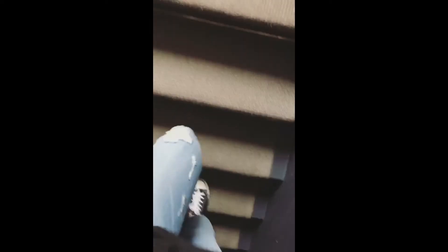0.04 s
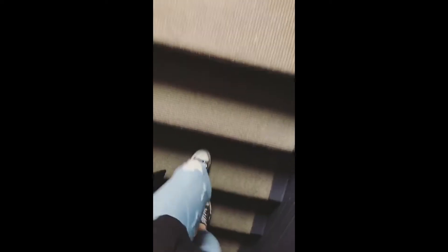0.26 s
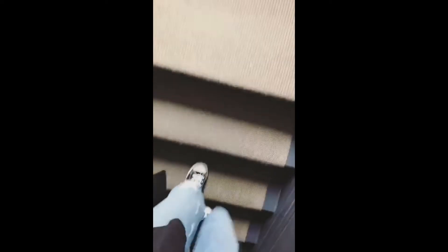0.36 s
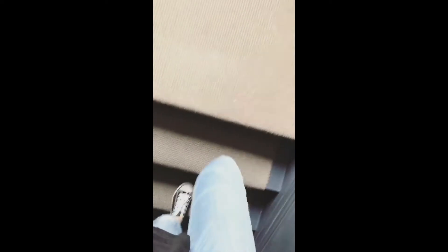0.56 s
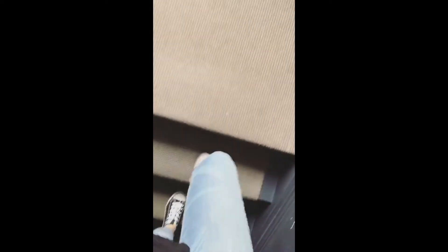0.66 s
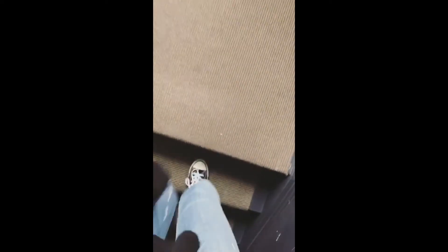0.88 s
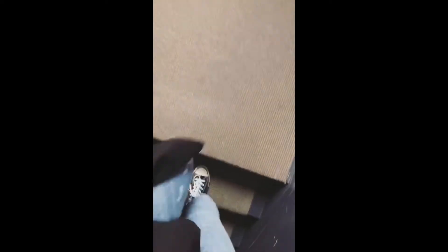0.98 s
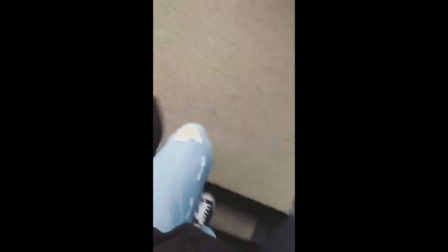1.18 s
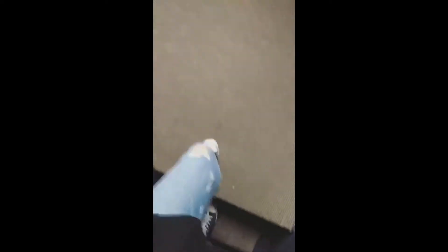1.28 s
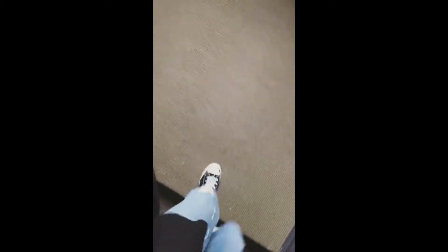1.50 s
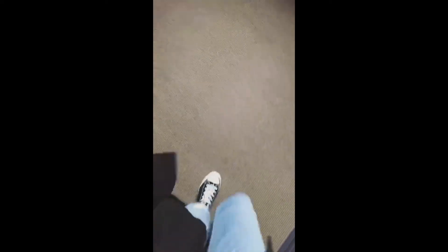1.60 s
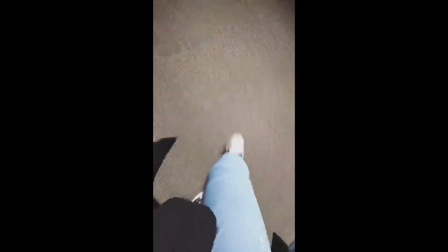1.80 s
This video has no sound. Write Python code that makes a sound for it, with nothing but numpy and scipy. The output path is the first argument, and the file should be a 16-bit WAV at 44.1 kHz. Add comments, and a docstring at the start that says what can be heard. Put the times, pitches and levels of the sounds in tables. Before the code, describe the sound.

Sneaker footsteps thud and knock on carpeted wooden stairs over a low rumble and hiss.

```python
"""Sneakers on carpeted stairs

Sneakers climb the last steps of a wooden staircase and reach the landing. Each sole taps,
knocks the tread and scuffs the carpet; the weight then makes the boards boom. One step lands
with a hard clack. Denim swishes, a tread creaks and rubber squeaks, all faintly.
The stairwell rings on over a low rumble and a steady hiss."""
import sys
import numpy as np
from scipy import signal
from scipy.fft import rfft, irfft, next_fast_len
from scipy.io import wavfile

SR = 44100
rng = np.random.default_rng(int(sys.argv[2]) if len(sys.argv) > 2 else 0)


def transcribe(u):
    """Save the signal u as a 16-bit wav file named by the first command-line argument.

    u: samples, shape (n,) or (channels, n), limited to [-1, 1]; the rate is SR.
    q: integer samples, one column per channel.
    """
    v = np.clip(np.atleast_2d(u).T, -1, 1)
    q = np.round(v * 32767).astype(np.int16)
    wavfile.write(sys.argv[1], SR, q)


N = 81585

# Tone of the indoor hiss. Each row: frequency in Hz, relative level in dB.
HISS_TONE = [(20, -11.5), (32, 2), (42, -12), (65, -6.5), (100, -11.5), (200, -19.5), (400, -25.5),
             (800, -31), (1600, -34.5), (3200, -40), (6200, -40.5), (15000, -43.5)]
# Loudness of the hiss. Each row: time in seconds, level in dB.
HISS_LEVELS = [(0, -53.5), (.3, -51.5), (.7, -50), (1.2, -52), (1.6, -50.5), (1.85, -53)]
# Loudness of the dull wash in the stairwell. Each row: time in seconds, level in dB.
WASH_LEVELS = [(0, -102), (.18, -66), (.55, -64.5), (1.1, -64), (1.55, -57.5), (1.85, -67.5)]
# Low thuds of the boards, and one soft swell as the boom returns.
# Each row: start in seconds, level in dB, pitch in Hz, seconds to the peak.
THUDS = [(.198, -29.5, 122.3, 0.019), (0.226, -32.5, 75.2, 0.03), (.243, -36, 140.5, 0.0097),
         (0.313, -41, 136, 0.046), (.720, -36, 110, .030), (0.742, -28.5, 74.8, 0.041),
         (.917, -46.5, 80.6, 0.062), (1.283, -28, 145, 0.0073), (1.2916, -26.5, 70.7, 0.034)]
# Steps that shake the staircase. Each row: start in seconds, boom level in dB, sway level in dB,
# pitch that rings best in Hz, factor on the ring time.
SHAKES = [(0.213, -37.5, -64, 139, 1.14), (0.303, -39, -41, 54.3, 1.03), (.395, -39.5, -59, 118, 0.93),
          (0.782, -36.5, -46, 81.7, 1.08), (1.324, -32.5, -44.5, 95, 0.74)]
# Deep notes of the stairs and stairwell. Each row: pitch in Hz, relative level in dB,
# ring time (seconds to fade by 60 dB) before a step's factor.
BOOM_NOTES = [(53.77, 3.5, 1), (69.95, -0.5, 0.84), (80.26, 3, 0.92), (117.5, -0.5, 0.44),
              (136, -2.5, 0.94), (145.9, -3.5, 0.81)]
# Soles knocking the tread. Each row: start in seconds, level in dB, pitch in Hz, fade time in seconds,
# then the levels of the echo and of the ringing wood, both in dB relative to the knock.
KNOCKS = [(0.2031, -36, 1272, 0.0029, -5.5, -30), (0.2089, -30, 205.5, 0.013, -9, -14),
          (0.3829, -25, 311.5, 0.0067, -6, -15), (0.7259, -36.5, 1300, 0.0016, -4, -21),
          (.746, -38, 224.3, 0.015, -4, -20.5), (.753, -40.5, 609, 0.011, -5.5, -21),
          (1.2864, -42, 1530, 0.0027, -21, -19), (1.287, -30.5, 349, 0.0055, -7.5, -14.5),
          (1.2885, -33.5, 654, 0.0037, -0.5, -14)]
# Notes of the wooden treads. Each row: pitch in Hz, relative level in dB, ring time in seconds.
WOOD_NOTES = [(200.3, -6.5, 0.53), (291.3, -8.5, 0.73), (359.2, -0.5, 0.55), (497, -8, 0.43),
              (602, -9.5, 0.31), (610.4, -6, 0.51), (674.4, -2, 0.39), (937, -4, 0.48), (1900, -17, .45),
              (2535, -9, 0.27)]
# How long the stairwell echoes. Each row: frequency in Hz, seconds to fade by 60 dB.
ECHO_TIMES = [(100, 0.29), (400, 0.96), (1000, 0.54), (2500, .5), (6000, 0.42), (11000, 0.4)]
# Rubber taps and clacks. Each row: start in seconds, level in dB, centre in Hz, width in octaves,
# rough length in seconds, echo level in dB relative to the tap.
TAPS = [(0.2083, -54.5, 2790, 1.1, 0.0028, 3), (0.2429, -52, 1490, 1.3, 0.0038, -2),
        (.2590, -53.5, 597, 1.9, 0.0045, 0), (.2775, -53.5, 546, 2.5, 0.0051, -9),
        (0.3778, -34, 4470, 1, 0.0015, -3.5), (.3812, -37, 650, 1.48, 0.0017, 6),
        (.7392, -58, 11100, .8, 0.0016, -14), (.7580, -43, 4630, 0.42, 0.0017, -3.5),
        (1.3035, -52, 2240, .8, 0.0027, 1.5), (1.349, -53, 3460, 0.94, 0.0022, -5),
        (1.3572, -54.5, 4040, 0.73, 0.0036, -15)]
# Soles rubbing the carpet. Each row: start in seconds, seconds to the peak, level in dB,
# tilt toward the treble in dB per octave.
SCUFFS = [(.222, 0.028, -42.5, -5), (.726, 0.023, -45, 1.5), (1.281, 0.019, -45.5, -0.5),
          (1.330, 0.04, -52, -1.1)]
# Tone of rubbed carpet. Each row: frequency in Hz, relative level in dB.
CARPET_TONE = [(100, -11.5), (300, 12.5), (900, -1), (2400, -2.5), (6000, -16.5), (14000, -17.5)]
# Denim brushing. Each row: start in seconds, seconds to the peak, level in dB.
SWISHES = [(1.07, 0.054, -68.5), (1.56, 0.027, -58)]
# Tone of brushed denim. Each row: frequency in Hz, relative level in dB.
DENIM_TONE = [(500, -16), (1400, -8), (2200, 6), (3500, 0), (5200, 4.5), (6200, 3), (6700, -8), (14000, -9)]
# A tread creaking. One row: start in seconds, seconds to the peak, level in dB, pitch in Hz.
CREAK = (1.185, .052, -53, 277)
# How well the microphone hears. Each row: frequency in Hz, gain in dB.
MICROPHONE_TONE = [(20, 1), (6600, -1), (7800, -7.5), (9300, -10), (10300, -15.5), (12500, -15),
                   (15000, -20.5)]

SWAY_HZ = 26.48  # the staircase sways and the building rumbles at this pitch


def amp(db):
    """Turns decibels into a factor to multiply by."""
    return 10 ** (np.asarray(db) / 20)


def unit(x):
    """Scales a sound to an average (rms) level of 1."""
    return x / np.sqrt(np.mean(x ** 2) + 1e-20)


def read(points, hz):
    """Looks up a frequency in a table, sliding between rows on a pitch scale."""
    f, value = np.transpose(points)
    return np.interp(np.log(hz + 1), np.log(f + 1), value)


def add(mix, s, sound):
    """Mixes a sound in, starting at s seconds."""
    part = mix[max(round(s * SR), 0):]
    part += sound[:len(part)]


def clock():
    """The time of each sample in seconds."""
    return np.arange(N) / SR


def coloured(x, tone):
    """Filters a sound by tone(Hz), given in dB, and scales it to level 1."""
    size = next_fast_len(N)
    hz = np.fft.rfftfreq(size, 1 / SR) + 1
    return unit(irfft(rfft(x, size) * amp(tone(hz)), size)[:N])


def noise(tone):
    """Fresh noise with the given tone."""
    return coloured(rng.standard_normal(N), tone)


def near(hz, centre_hz, octaves):
    """A weight that is 1 at the centre pitch and a half the given octaves away."""
    return 1 / (1 + (np.log2(hz / centre_hz) / octaves) ** 2)


def swell(peak_s, sharpness):
    """A loudness curve that rises to 1 and dies away."""
    u = clock() / peak_s
    return (u * np.exp(1 - u)) ** sharpness


def sine(hz):
    """A steady, pure note."""
    return np.sin(2 * np.pi * hz * clock())


def ring(hz, ring_s):
    """A note that fades by 60 dB in ring_s seconds."""
    return sine(hz) * np.exp(-np.log(1000) * clock() / ring_s)


def rise(seconds):
    """A soft start, from 0 toward 1."""
    return 1 - np.exp(-clock() / seconds)


def with_send(sound, echo_db):
    """Makes two columns: the direct sound and the part sent off to echo."""
    return np.outer(sound, [1, amp(echo_db)])


def background():
    """Indoor hiss and the deep rumble of the building."""
    hiss = noise(lambda f: read(HISS_TONE, f))
    hiss_db = np.interp(clock(), *np.transpose(HISS_LEVELS))
    rumble = noise(lambda f: 40 * np.log10(near(f, SWAY_HZ, octaves=0.19)))
    return amp(hiss_db) * hiss + amp(-59.5) * rumble


def wash():
    """Dull noise lingers in the stairwell and is loudest near the end."""
    dull = noise(lambda f: 20 * np.log10(near(f, centre_hz=259, octaves=0.6)))
    return dull * amp(np.interp(clock(), *np.transpose(WASH_LEVELS)))


def boards():
    """The boards thud and the staircase booms and sways; once, the boom returns in a soft swell."""
    out = np.zeros(N)
    for s, db, hz, peak_s in THUDS:
        add(out, s, amp(db) * swell(peak_s, sharpness=4.4) * sine(hz))
    for s, boom_db, sway_db, best_hz, stretch in SHAKES:
        boom = sum(amp(boom_db + note_db) * near(hz, best_hz, octaves=0.64) * ring(hz, stretch * ring_s)
                   for hz, note_db, ring_s in BOOM_NOTES)
        sway = amp(sway_db) * ring(SWAY_HZ, ring_s=4.8)
        add(out, s, boom * rise(0.0046) + sway * rise(0.03))
    return out


def knocks():
    """A sole gives a short knock; the wood's notes close to that pitch ring on."""
    out = np.zeros((N, 2))
    for s, db, hz, fade_s, echo_db, wood_db in KNOCKS:
        blow = sine(hz) * np.exp(-clock() / fade_s) * rise(0.0005) ** 2
        wood = sum(amp(wood_db + note_db) * near(note_hz, hz, octaves=1.43) * ring(note_hz, ring_s)
                   for note_hz, note_db, ring_s in WOOD_NOTES)
        add(out, s, amp(db) * with_send(blow, echo_db))
        add(out[:, 0], s, amp(db) * wood * rise(0.0013))  # the wood gets no echo
    return out


def stairwell(sound):
    """The stairwell returns a crowd of echoes; the low middle tones last longest."""
    echoes = rng.choice([-1., 1.], N) * (rng.random(N) < 4000 / SR)  # about 4000 a second
    hz, t, spectrum = signal.stft(echoes, SR, nperseg=256)
    fade_db = -60 * t / read(ECHO_TIMES, hz)[:, None]
    early_dip_db = -1.5 * np.exp(-t / 0.09)
    tail = signal.istft(spectrum * amp(fade_db + early_dip_db), SR, nperseg=256)[1][:N]
    tail *= rise(0.0025) ** 2
    return signal.fftconvolve(sound, tail / np.linalg.norm(tail))[:N]


def taps():
    """Rubber meets an edge with a tiny burst of noise and sends one click off to echo."""
    out = np.zeros((N, 2))
    for s, db, hz, octaves, length_s, echo_db in TAPS:
        def tone(f):
            """Loudest at the tap's centre, falling away on both sides."""
            return -9 * np.hypot(1, np.log2(f / hz) / octaves)
        burst = noise(tone) * swell(length_s / 2, sharpness=0.71)
        click = coloured(signal.unit_impulse(N, SR // 1000), tone)
        click *= np.linalg.norm(burst) / np.linalg.norm(click)  # same energy as the burst
        add(out, s, amp(db) * np.column_stack([burst, amp(echo_db) * click]))
    return out


def scuffs(grains_per_s=6000):
    """A sole rubs the carpet, making a gritty spray of tiny clicks."""
    out = np.zeros((N, 2))
    for s, peak_s, db, tilt_db in SCUFFS:
        grain_db = 2.5 * np.minimum(rng.exponential(1, N), 3)
        grains = amp(grain_db) * rng.standard_normal(N) * (rng.random(N) < grains_per_s / SR)
        grit = coloured(grains, lambda f: read(CARPET_TONE, f) + tilt_db * np.log2(f))
        add(out, s, amp(db) * with_send(grit * swell(peak_s, sharpness=3.8), echo_db=-2.5))
    return out


def swishes():
    """Denim brushes with a smooth swell of noise."""
    out = np.zeros((N, 2))
    for s, peak_s, db in SWISHES:
        cloth = noise(lambda f: read(DENIM_TONE, f))
        add(out, s, amp(db) * with_send(cloth * swell(peak_s, sharpness=0.56), echo_db=-15))
    return out


def creak():
    """A tread groans softly under the carpet as the foot pushes off."""
    out = np.zeros(N)
    s, peak_s, db, hz = CREAK
    add(out, s, amp(db) * swell(peak_s, sharpness=1.8) * sine(hz))
    return out


def squeak(start_s=1.6):
    """Rubber gives a thin, faint whistle as the foot turns."""
    out = np.zeros(N)
    whistle = noise(lambda f: 20 * np.log10(near(f, centre_hz=5980, octaves=0.031)))
    add(out, start_s, amp(-62) * swell(peak_s=0.015, sharpness=0.89) * whistle)
    return out


def scene():
    """Mixes the steps, their echoes and the background into one channel."""
    direct, sent = (knocks() + taps() + scuffs() + swishes()).T
    mix = boards() + creak() + direct + stairwell(sent) + background() + wash() + squeak()
    return mix[None]


def record(dry, cutoff_hz=15250):
    """A small microphone dulls the treble; everything above the cutoff is removed."""
    size = next_fast_len(2 * N)
    gain = amp(read(MICROPHONE_TONE, np.fft.rfftfreq(size, 1 / SR)))
    heard = irfft(rfft(dry, size) * gain, size)[:, :N]
    lowpass = signal.firwin(511, cutoff_hz, window=("kaiser", 9), fs=SR)
    return signal.oaconvolve(heard, lowpass[None], "same")


dry = scene()
out = record(dry)
transcribe(out)
```